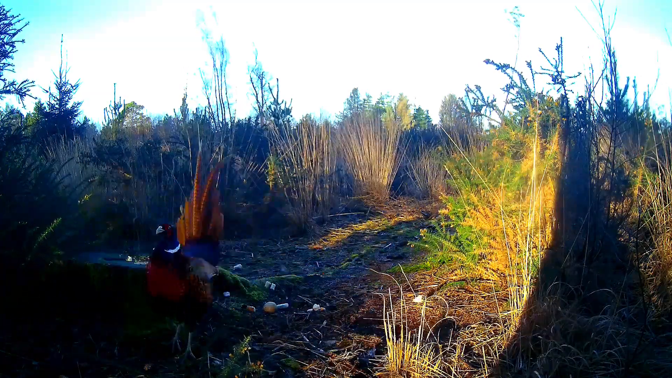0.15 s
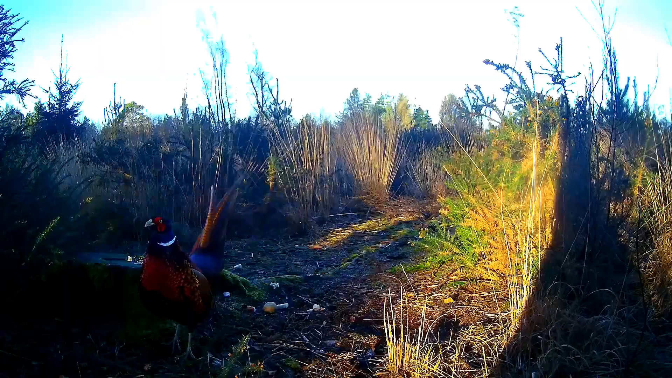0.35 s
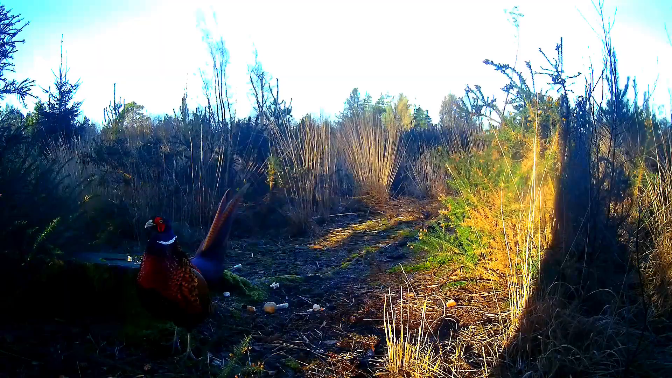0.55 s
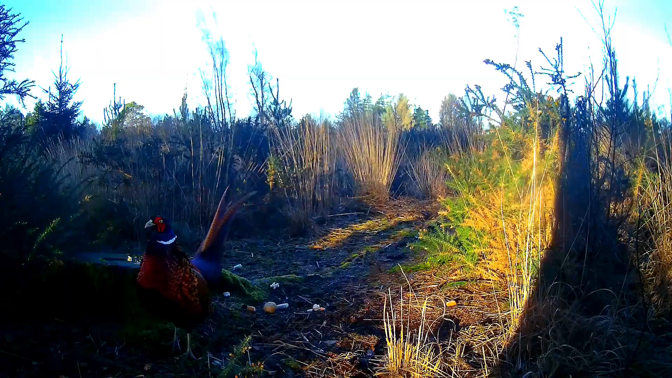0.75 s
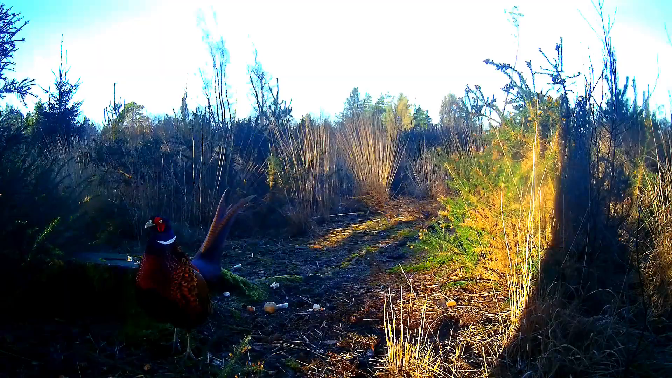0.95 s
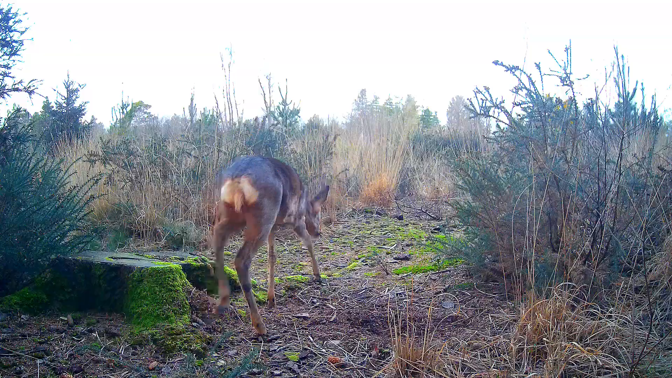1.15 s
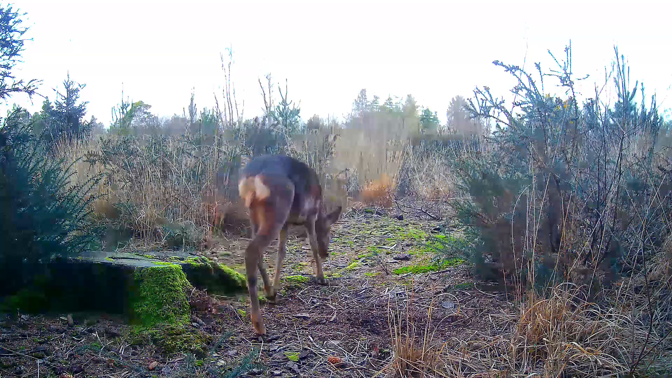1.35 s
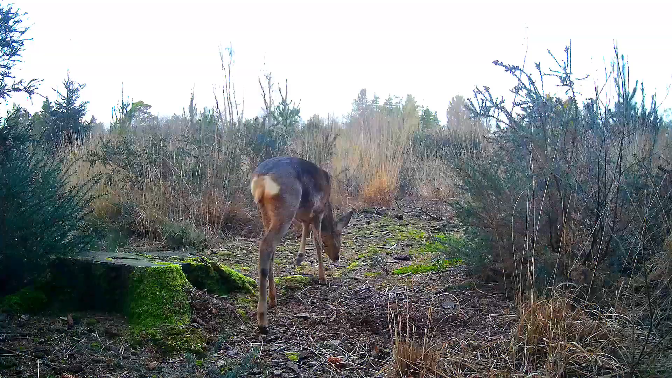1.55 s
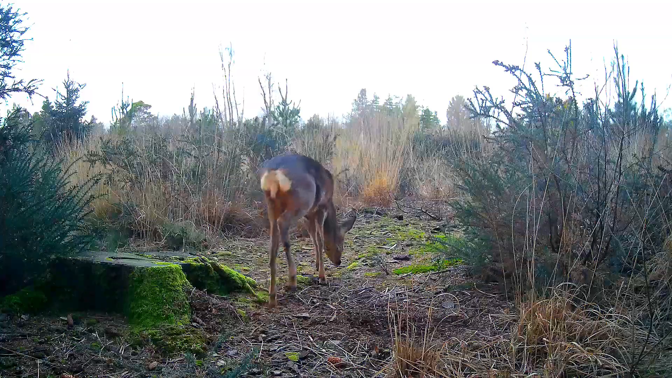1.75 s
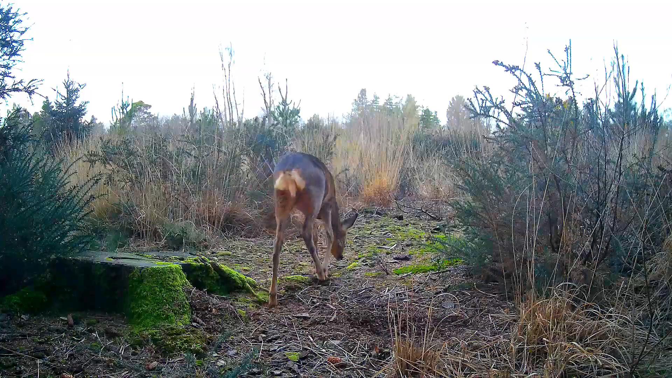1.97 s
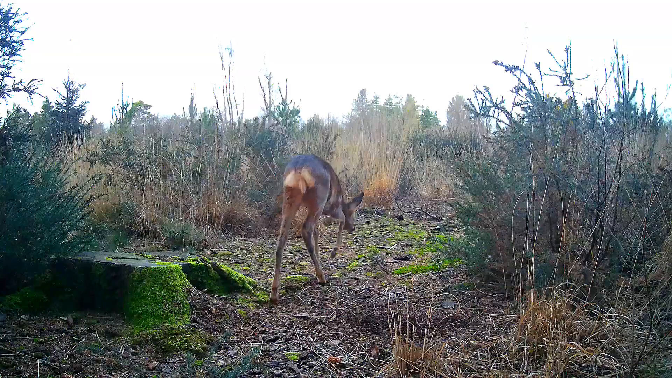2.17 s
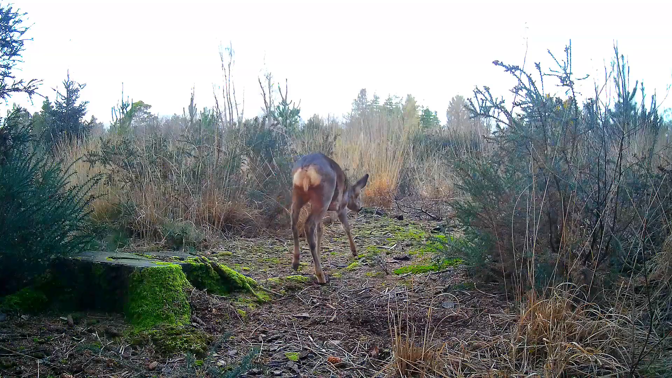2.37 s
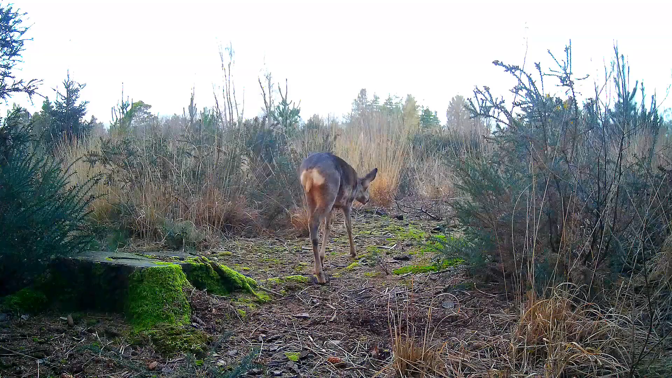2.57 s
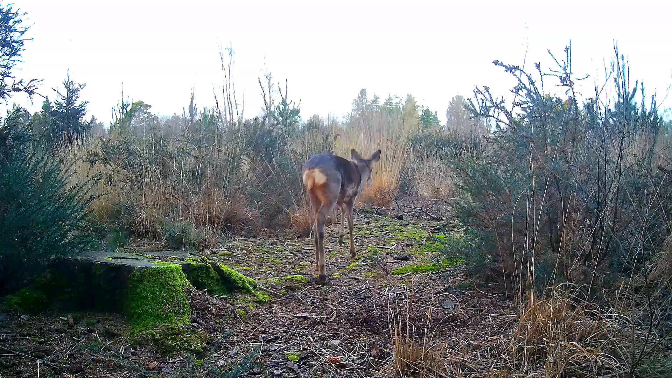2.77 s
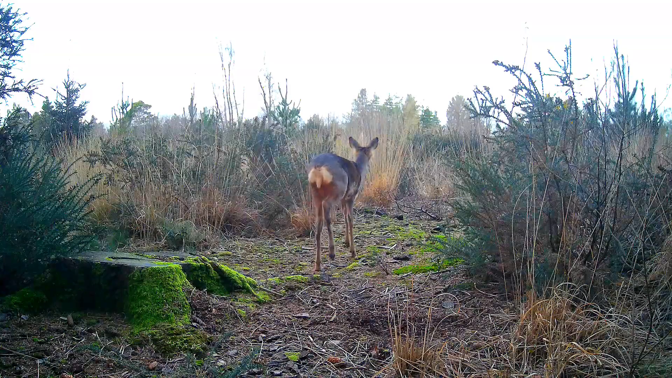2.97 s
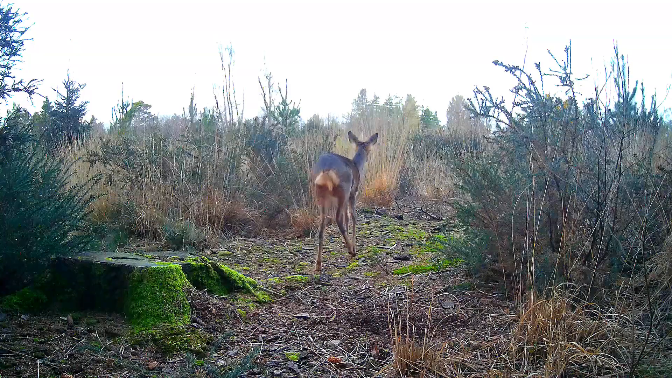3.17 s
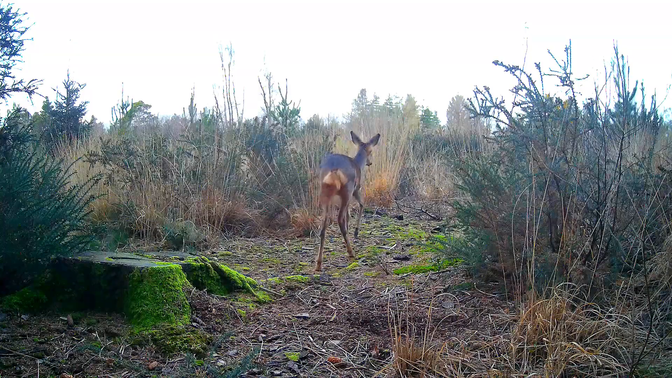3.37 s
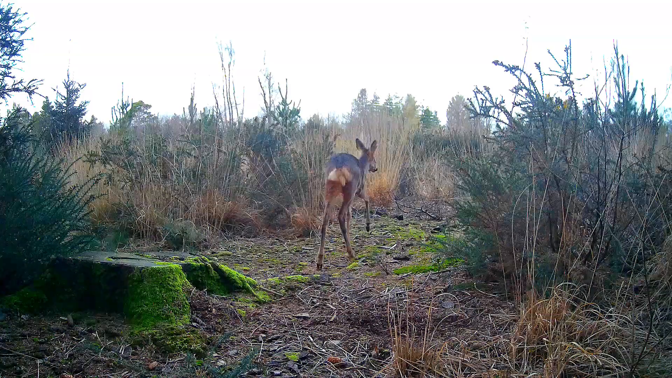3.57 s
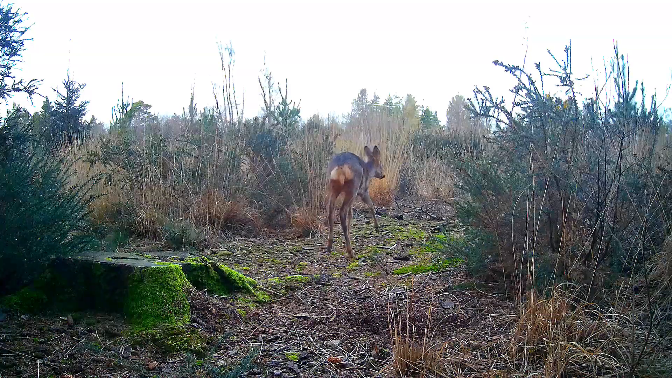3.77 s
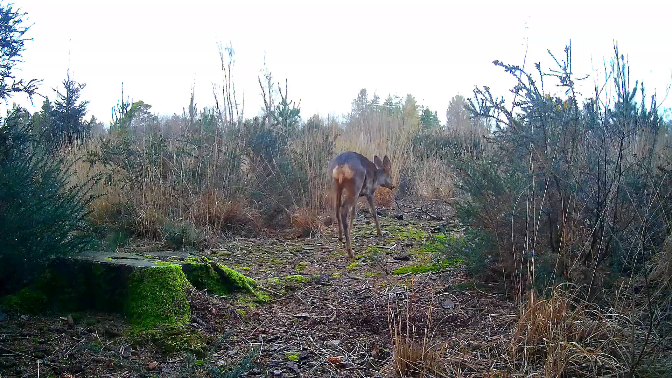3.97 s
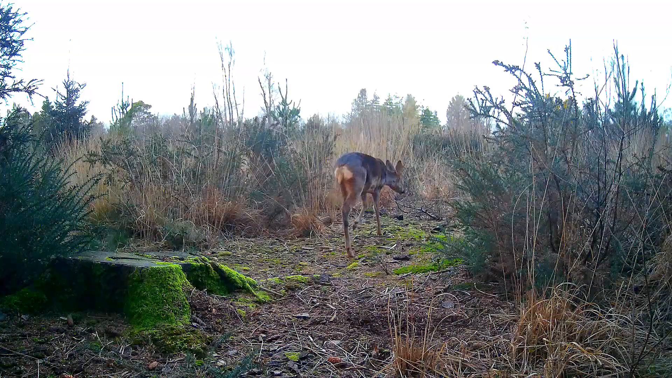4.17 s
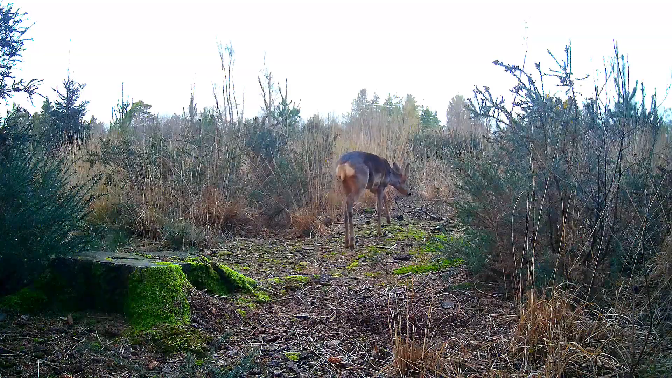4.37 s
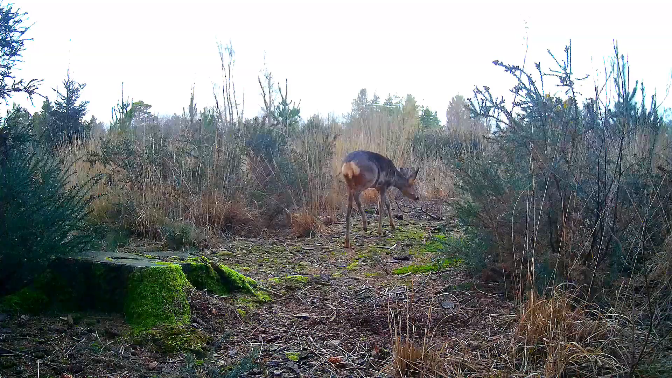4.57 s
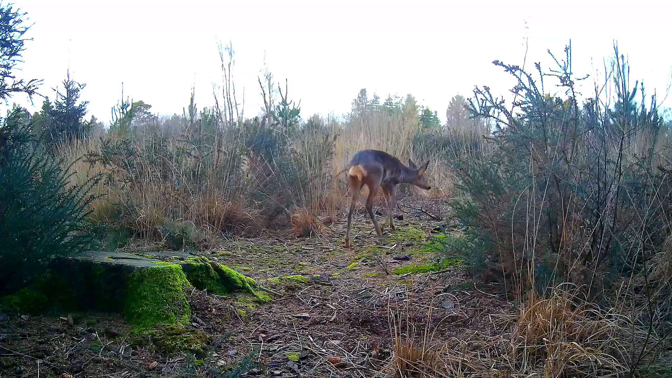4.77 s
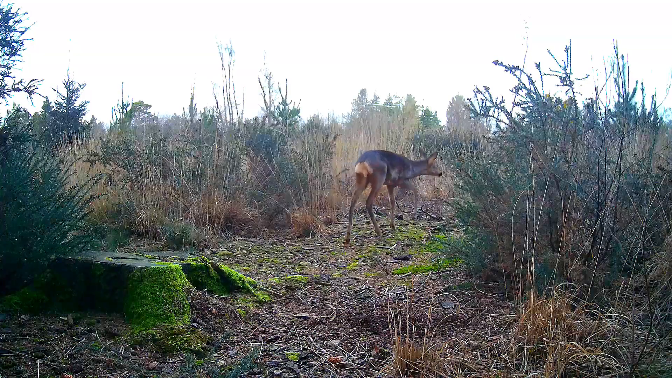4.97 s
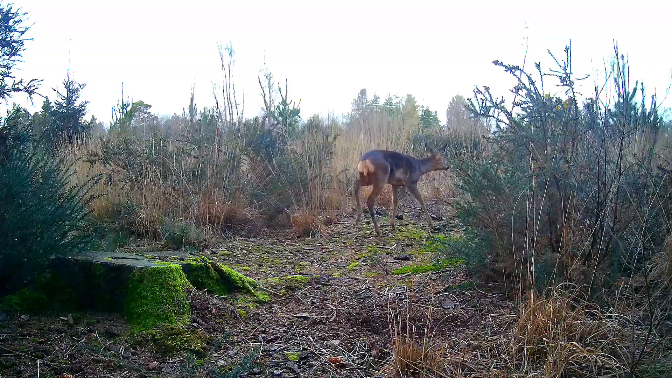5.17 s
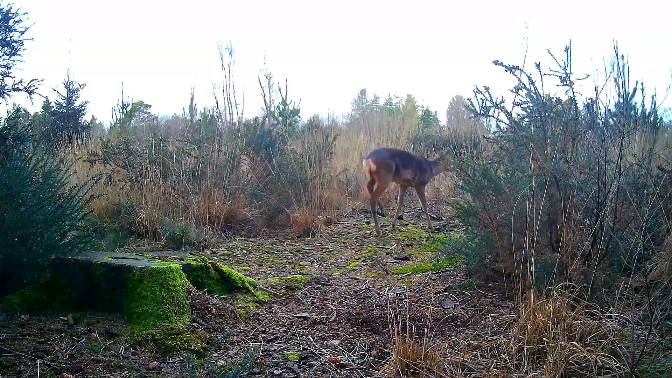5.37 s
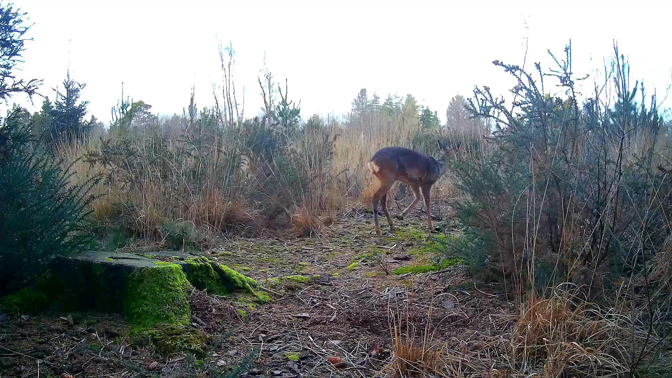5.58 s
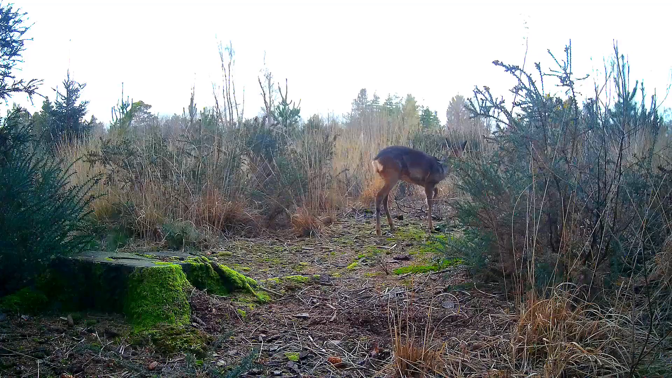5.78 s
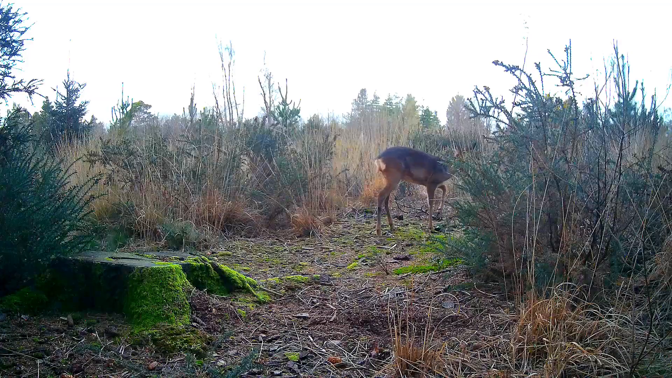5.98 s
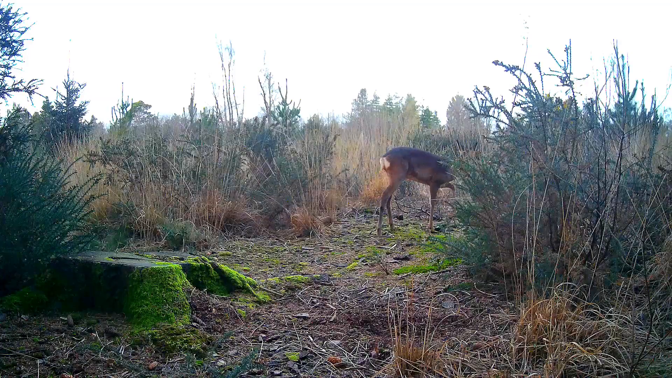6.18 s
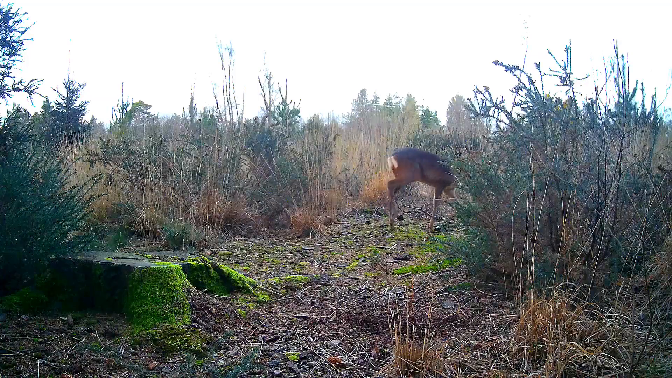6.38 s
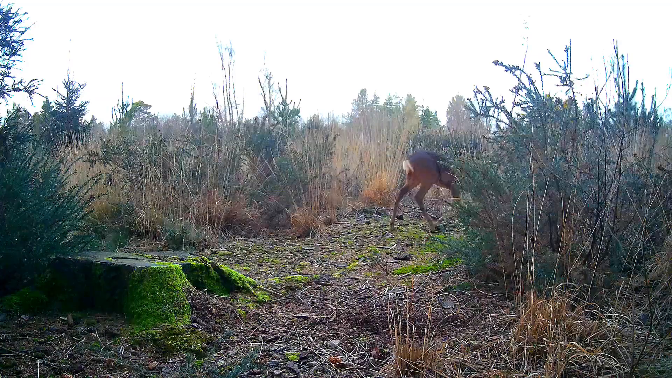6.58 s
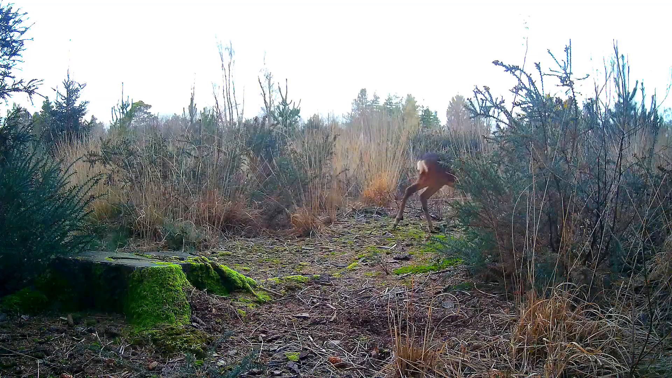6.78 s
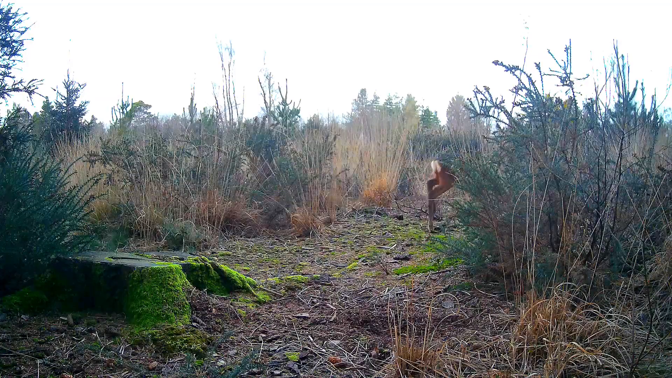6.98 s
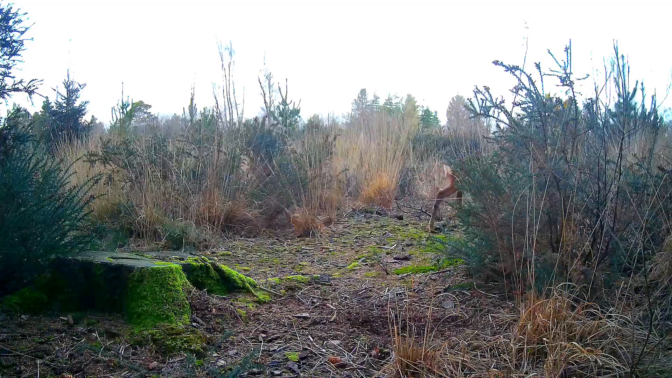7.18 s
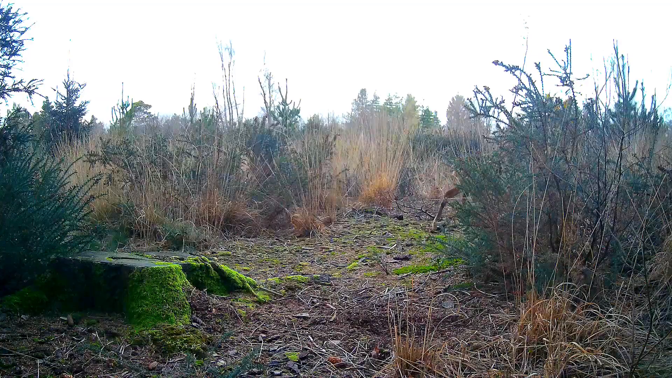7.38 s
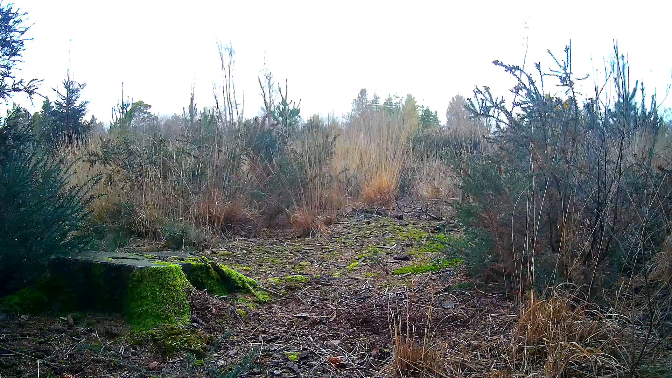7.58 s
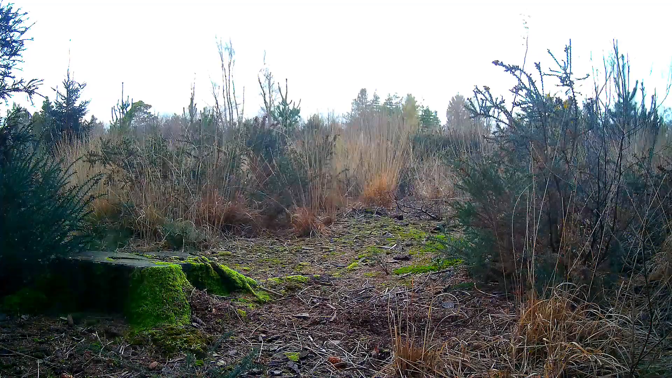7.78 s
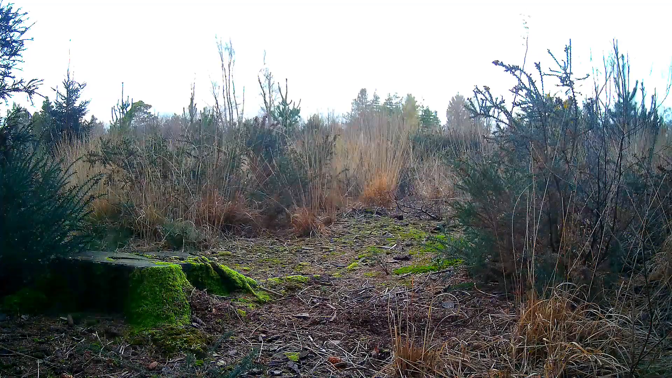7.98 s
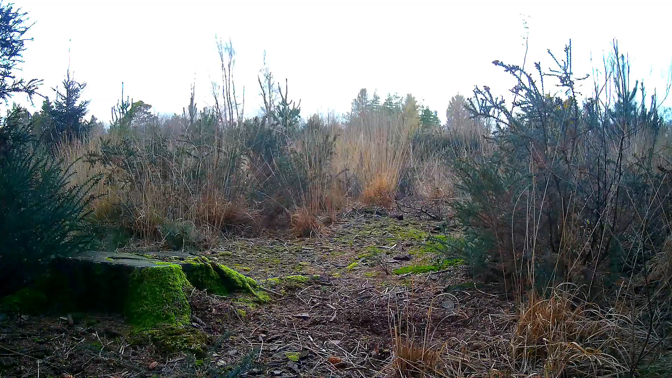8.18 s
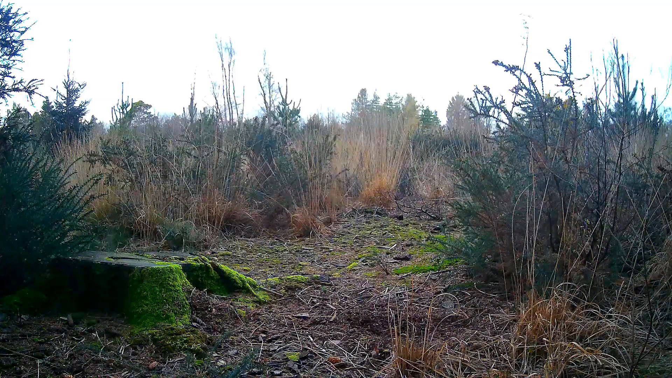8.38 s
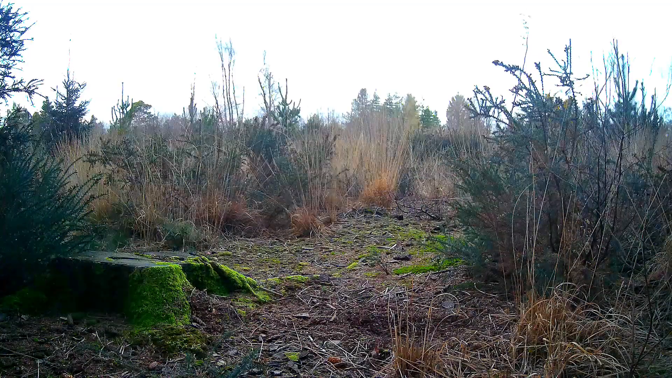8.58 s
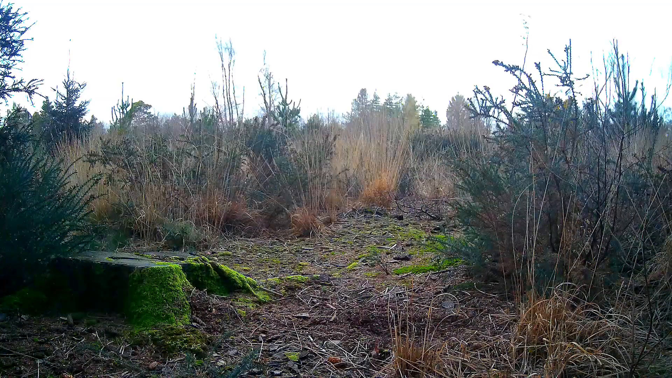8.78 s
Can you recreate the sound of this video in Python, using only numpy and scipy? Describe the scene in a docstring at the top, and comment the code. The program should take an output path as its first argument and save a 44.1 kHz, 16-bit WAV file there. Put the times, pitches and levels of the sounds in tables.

```python
"""A heath clearing among trees, over a hiss of air and of a small camera, 2 dB louder until about 1.1 s.
First a pheasant ends its display with the last fast wing beats, low pulses of air with noise rustle, while a
close warbler sings gliding sines. From 2.2 s a softer singer answers to the right; two twigs ring in short
modes under a deer's hooves; faint birds call far ahead, then far left. Late come thin high whistles, then a
quick low chatter. Trunks scatter every note and tick into a short tail, by convolution with dying noise."""
import sys
import numpy as np
from scipy import signal
from scipy.fft import rfft, irfft
from scipy.io import wavfile
from scipy.ndimage import uniform_filter1d

SR = 44100
rng = np.random.default_rng(int(sys.argv[2]) if len(sys.argv) > 2 else 0)


def invert_db(x):
    """Field ratio 10**(x/20) for x, a level in decibels (scalar or array-like)."""
    u = np.asarray(x, float) / 20
    return 10 ** u


def persist_wave(psi):
    """Save psi, clipped to +-1, as 16-bit WAV."""
    counts = np.round(np.clip(psi, -1, 1) * 32767).astype(np.int16)
    wavfile.write(sys.argv[1], SR, np.atleast_2d(counts).T)


N = 389844

# hiss spectra, shared by both sides and opposed, before scaling to rms 1: [f/Hz, relative level/dB per Hz]
HISS_SHARED = [(12, -27), (20, 2.5), (129, -3.5), (343, -8.5), (885, -6), (3190, -14.5), (15600, -18.5)]
HISS_OPPOSED = [(59, -62), (100, -24), (488, 1), (980, 1), (4780, -6.5), (15600, -10)]
# wing beats: [t/s, push level/dB, feather rustle reference level/dB]
WING_BEATS = [(0.008, -13.5, -32), (0.029, -22, -38.5), (0.058, -20, -32.5), (0.084, -14.5, -32),
              (0.0956, -33, -40.5), (0.103, -24.5, -42), (0.134, -22, -34), (0.163, -22.5, -44),
              (0.172, -26, -38)]
# thin flicks of the quills: [t/s, level/dB]
QUILL_FLICKS = [(0.026, -38), (0.101, -41.5), (0.155, -47)]

# Song levels are those at a note's crest, before the weighting by pitch.
# the close singer's left-right balance turns with pitch: [f/Hz, left over right level/dB]
NEAR_BALANCE = [(3200, -10), (4600, -11), (5200, 18), (6000, -2)]
# close singer's slurs: [start t/s, length t/s, from f/Hz, to f/Hz, level/dB]
NEAR_SLURS = [ (0, 0.013, 5300, 5080, -46.5), (.047, 0.029, 6010, 4730, -43.5),
              (.073, 0.04, 4690, 4675, -48.5), (.198, 0.027, 2704, 4320, -51),
              (.216, 0.041, 4420, 4050, -49), (.298, .042, 4310, 4740, -45.5),
              (.421, 0.012, 4980, 3030, -46), (.518, 0.0057, 4830, 6220, -45.5),
              (.527, 0.0091, 4760, 5310, -43), (.535, 0.11, 5290, 5030, -48),
              (.668, 0.024, 5110, 5060, -49), (.83, 0.0075, 4980, 4860, -41.5),
              (.838, 0.022, 4800, 6660, -45), (.937, 0.037, 3070, 3294, -61.5),
              (.975, 0.038, 3300, 4020, -54), (1.078, 0.014, 4020, 5320, -43),
              (1.09, 0.012, 5270, 5265, -41.5), (1.107, 0.005, 5300, 4430, -44),
              (1.117, .006, 5140, 4400, -50), (1.32, 0.045, 2670, 4490, -55.5),
              (1.365, 0.039, 4570, 4020, -49), (1.634, 0.033, 4860, 5920, -50.5),
              (1.661, 0.012, 5820, 5090, -44), (1.676, 0.028, 5000, 5320, -48),
              (1.77, 0.038, 3293, 5450, -45), (1.805, 0.037, 5460, 4560, -46.5)]
# its arches, up and back: [start t/s, length t/s, edge f/Hz, turn f/Hz, level/dB]
NEAR_ARCHES = [ (.245, 0.034, 4010, 5404, -47), (0.433, 0.033, 3050, 3460, -56.5),
               (0.706, 0.012, 3080, 3810, -54), (0.762, 0.02, 2970, 3536, -54),
               (0.819, 0.018, 4780, 6000, -51.5), (1.057, 0.01, 4450, 5400, -52),
               (1.171, 0.018, 4600, 4830, -46.5), (1.235, 0.016, 4550, 4676, -45),
               (1.465, .03, 2830, 3360, -60), (1.498, 0.074, 2720, 3090, -60.5),
               (1.749, 0.012, 3470, 4860, -48)]
# its one buzz: [start t/s, length t/s, centre f/Hz, swing f/Hz, level/dB]
NEAR_BUZZ = (.997, .04, 3900, 430, -52)
# softer singer to the right, slurs: [start t/s, length t/s, from f/Hz, to f/Hz, level/dB]
SECOND_SLURS = [ (2.24, 0.018, 3820, 4560, -62), (2.26, 0.1, 4560, 4640, -68),
                (2.343, 0.1, 5680, 6680, -60.5), (2.563, 0.015, 5800, 4770, -61),
                (2.582, .015, 3920, 3480, -65), (2.61, .045, 3490, 3900, -68),
                (2.757, 0.028, 7000, 5750, -58.5), (2.828, 0.027, 5560, 5300, -59),
                (2.874, 0.02, 7600, 5800, -58.5), (2.972, .02, 3630, 4667, -64),
                (2.992, 0.06, 4640, 4630, -63), (3.293, 0.014, 5590, 4700, -58.5),
                (3.318, 0.014, 3630, 5550, -63), (3.33, 0.091, 5530, 5700, -70),
                (3.42, .07, 6860, 6790, -56), (3.49, 0.071, 6750, 5550, -57.5),
                (3.578, .041, 1900, 4510, -52), (3.619, 0.033, 4540, 4250, -53),
                (8.64, 0.091, 4590, 3880, -62), (8.724, 0.011, 3950, 4380, -60),
                (8.737, 0.01, 4500, 4600, -50), (8.828, 0.01, 4900, 2870, -56)]
# its arches: [start t/s, length t/s, edge f/Hz, turn f/Hz, level/dB]
SECOND_ARCHES = [(2.718, 0.031, 5200, 5380, -63), (6.145, .047, 3270, 3850, -56),
                 (6.194, 0.093, 3334, 3830, -55)]
# twig snaps: [t/s, level/dB, left over right level/dB]
TWIG_SNAPS = [(2.5564, -47.5, 5), (3.2054, -37, 5.5)]
# modes of a twig: [f/Hz, relative level/dB, decay by 60 dB t/s]
TWIG_MODES = [(1310, -20, 0.035), (2760, -0.5, 0.0078), (4100, 3, 0.0029), (8800, -14, .005)]
# far bird ahead, a rise and a sag with a hook: [t/s after the start, f/Hz at pitch ratio 1]
RISE = [(0, 4780), (.12, 6050)]
SAG = [(0, 5100), (.07, 4450), (.13, 4100), (.2, 5150)]
# their repeats: [start t/s, pitch ratio, level/dB]
RISE_REPEATS = [(3.13, 0.9, -75.5), (6.545, 0.98, -76), (7.11, 1.01, -76), (7.71, 1, -75.5)]
SAG_REPEATS = [(2.845, 0.95, -75.5), (6.28, 0.93, -76), (6.824, 1, -74.5), (7.385, 0.99, -74)]
# far bird on the left, a long fall and a short rise: [t/s after the start, f/Hz at pitch ratio 1]
SWOOP = [(0, 5400), (.04, 4530), (.11, 3600), (.165, 5470)]
# its repeats: [start t/s, pitch ratio, level/dB]
SWOOP_REPEATS = [(4.228, 1.15, -86.5), (4.714, 1, -82.5), (5.177, 1.01, -86)]
# its single slurs: [start t/s, length t/s, from f/Hz, to f/Hz, level/dB]
LEFT_SLURS = [(4.01, .08, 4800, 5900, -83.5), (5.6, 0.11, 6190, 4500, -86.5), (5.61, .025, 3480, 3500, -80),
              (5.77, 0.048, 4050, 4120, -86), (5.82, .1, 8550, 8570, -80)]
# thin high whistles, falling: [start t/s, length t/s, from f/Hz, to f/Hz, level/dB]
HIGH_SLURS = [(6.905, 0.068, 7370, 7120, -61.5), (7.038, .067, 7340, 7160, -63),
              (7.255, 0.085, 8560, 7800, -58.5), (7.348, 0.15, 9100, 7820, -50),
              (7.468, 0.095, 8050, 7200, -58.5)]
# and one arch: [start t/s, length t/s, edge f/Hz, turn f/Hz, level/dB]
HIGH_ARCHES = [(7.345, 0.056, 7550, 7900, -59)]
# quick low chatter, slurs: [start t/s, length t/s, from f/Hz, to f/Hz, level/dB]
CHATTER_SLURS = [ (7.788, 0.0086, 3800, 4030, -52.5), (7.802, 0.014, 3420, 2600, -48.5),
                 (7.812, 0.049, 2890, 2050, -49.5), (7.941, .006, 3400, 3950, -55),
                 (7.958, 0.026, 3720, 2115, -53.5), (7.978, 0.029, 3390, 3470, -54),
                 (8.024, 0.018, 3520, 4130, -57.5), (8.052, 0.019, 2300, 2880, -56),
                 (8.078, 0.014, 3630, 4100, -53.5), (8.118, 0.02, 2270, 2400, -55),
                 (8.135, 0.0074, 3750, 3700, -54.5), (8.185, 0.0083, 3960, 3540, -50),
                 (8.199, 0.02, 2040, 2830, -59.5), (8.238, 0.019, 3250, 3550, -61),
                 (8.295, .02, 2950, 3200, -62), (8.815, .01, 3750, 3780, -60)]
# its arches: [start t/s, length t/s, edge f/Hz, turn f/Hz, level/dB]
CHATTER_ARCHES = [(8.099, 0.015, 2790, 3310, -56), (8.147, .025, 2490, 3030, -57.5)]


def rms_one(x):
    """Normalisation: division by the root mean square gives unit effective value."""
    return x / np.sqrt(np.mean(x ** 2) + 1e-20)


def band(x, low_hz, high_hz):
    """Band-pass filtering with a maximally flat (Butterworth) response."""
    return signal.sosfilt(signal.butter(2, [low_hz, high_hz], "band", fs=SR, output="sos"), x)


def steep(x, low_hz, high_hz):
    """Cascaded filters: two equal band-passes double the slopes beside the band; rms 1."""
    return rms_one(band(band(x, low_hz, high_hz), low_hz, high_hz))


def pan(x, db):
    """Intensity stereophony: two channels whose levels differ by db, left over right."""
    return x * np.array([invert_db(db / 2), invert_db(-db / 2)]).reshape(2, -1)


def coloured(spectrum):
    """Spectral shaping: white noise weighted in the frequency domain, rms 1."""
    hz, db = np.transpose(spectrum)
    log_hz = np.log(np.fft.rfftfreq(N, 1 / SR) + 1)
    shape = invert_db(np.interp(log_hz, np.log(hz + 1), db))
    return rms_one(irfft(rfft(rng.standard_normal(N)) * shape, N))


def hiss():
    """Superposed shared and opposed noise: air and camera hiss, 2 dB louder until about 1.1 s."""
    shared = invert_db(-62) * coloured(HISS_SHARED)
    opposed = invert_db(-66.5) * coloured(HISS_OPPOSED)
    extra_db = np.interp(np.arange(N) / SR, [1.06, 1.12], [2.0, 0])
    return np.array([shared + opposed, shared - opposed]) * invert_db(extra_db)


def wings():
    """Pulsed air displacement: each stroke sucks a low pulse and leaves eddies and rustle; quills flick."""
    vane_hz = 1180  # buzz of a loaded feather
    length = SR // 2
    t, out = np.arange(length) / SR, np.zeros(N)
    noise = rng.standard_normal((4, length))
    eddies = steep(noise[0], 94, 344)
    swish = rms_one(band(noise[1], 930, 2570)) + 0.5 * noise[1]
    rustle = steep(noise[2], 832, 1490)
    thin = rms_one(band(noise[3], 4400, 5430))
    rattle = invert_db(2.2 * rms_one(band(noise[3], 44, 200)))  # feathers clatter in uneven lumps
    for s, push_db, rustle_db in WING_BEATS:
        width_s = 0.0024 * invert_db(0.35 * (push_db + 18.0))  # stronger pulses are wider
        u = (t - s - 0.001) / width_s
        push = -invert_db(push_db) * (1 - 0.54 * u ** 2) * np.exp(-0.4 * u ** 2)
        slow = np.exp(-((t - s) / 0.012) ** 2)
        quick = np.exp(-((t - s) / 0.0036) ** 2)
        feathers = invert_db(rustle_db - 14.0) * rustle + invert_db(rustle_db - 18.5) * swish
        lasting = invert_db(push_db - 18.5) * eddies + rattle * feathers
        vane = np.sin(2 * np.pi * vane_hz * (t - s))
        brief = invert_db(rustle_db - 7.0) * (0.5 * rustle + vane)
        out[:length] += push + slow * lasting + quick * brief
    for s, db in QUILL_FLICKS:
        envelope = invert_db(db) * np.exp(-((t - s) / 0.0026) ** 2)
        out[:length] += envelope * (thin + 0.8 * rustle + 0.2 * swish)
    return out


def whistle(note, tremble, overtone_db, tilt_db, count):
    """Harmonic synthesis: a gliding sine and overtones, tilt_db weaker per octave from the beak's pitch."""
    beak_hz, fade_s = 4600, 0.0015
    s, hz, db = np.transpose(note)
    t = np.arange(round(s[0] * SR), min(round(s[-1] * SR), N))
    pitch = uniform_filter1d(np.interp(t / SR, s, hz), size=67, mode="nearest")
    level_db = uniform_filter1d(np.interp(t / SR, s, db), size=67, mode="nearest")
    phase = 2 * np.pi * np.cumsum(pitch * tremble[t]) / SR
    fade = np.clip(np.minimum(t - t[0], t[-1] - t) / (fade_s * SR), 0, 1)
    tone = 0
    for k in range(1, count + 1):
        partial_db = overtone_db * (k > 1) - tilt_db * abs(np.log2(k * pitch / beak_hz))
        tone = tone + invert_db(partial_db) * np.sin(k * phase)
    return t, pitch, np.sqrt(2) * invert_db(level_db) * fade * tone


def song(notes, balance, waver=0.14, overtone_db=-46.0, tilt_db=0, count=3):
    """Random frequency and amplitude modulation: the pitch trembles and the level wavers."""
    out = np.zeros((2, N))
    tremble = 1 + 0.0066 * rms_one(band(rng.standard_normal(N), 25.4, 123))
    for note in notes:
        t, pitch, tone = whistle(note, tremble, overtone_db, tilt_db, count)
        out[:, t] += pan(tone, np.interp(pitch, *np.transpose(balance)))
    return out * (1 + waver * rms_one(band(rng.standard_normal(N), 4.9, 120)))


def voiced(row, u, hz, lean_db=0, onset_db=0, fade_db=0, crest=0.28):
    """Vocal effort: a note swells to its crest, fades, and is lean_db softer per octave below its top."""
    swell = np.interp(u, [0, crest, 1], [-onset_db, 0, -fade_db])
    level_db = row[4] + swell - lean_db * np.log2(hz.max() / hz)
    return np.transpose([row[0] + row[1] * u, hz, level_db])


def phrase(slurs, arches, bend, turn=0.319, **effort):
    """Pitch glides: slurs relax exponentially, arches turn back; notes that touch share one breath."""
    legato_s = 0.003
    u = np.linspace(0, 1, 25)
    settle = (1 - np.exp(-bend * u)) / (1 - np.exp(-bend))
    bow = np.sin(np.pi * u ** (np.log(0.5) / np.log(turn)))  # turn: share of the arch before it turns
    notes = []
    for rows, shape in ((slurs, settle), (arches, bow)):
        for row in rows:
            hz = row[2] + (row[3] - row[2]) * shape
            notes.append(voiced(row, u, hz, **effort))
    joined = []
    for note in sorted(notes, key=lambda note: note[0, 0]):
        if joined and abs(note[0, 0] - joined[-1][-1, 0]) < legato_s:
            note = np.vstack([joined.pop()[:-1], note[1:]])
            note[:, 0] = np.maximum.accumulate(note[:, 0])
        joined.append(note)
    return joined


def buzz():
    """Sinusoidal frequency modulation: the pitch swings fast about its centre."""
    swings_per_s = 130
    start, length, hz, swing_hz, db = NEAR_BUZZ
    t = np.linspace(0, length, 100)
    pitch = hz + swing_hz * np.sin(2 * np.pi * swings_per_s * t)
    return np.transpose([start + t, pitch, db + 0 * t])


def near_singer():
    """Frequency-dependent level difference: the close warbler's notes shift sideways with pitch."""
    notes = phrase(NEAR_SLURS, NEAR_ARCHES, bend=2.6, lean_db=18.5)
    return song(notes + [buzz()], NEAR_BALANCE, overtone_db=-29.0)


def wood(x):
    """Multiple scattering: dense echoes from trunks; near ones die fast, the far edge lingers."""
    near_t60_s, far_t60_s = 0.48, 2.6
    t = np.arange(SR) / SR  # the response is cut at 1 s
    decay = invert_db(-60 * t / near_t60_s) + invert_db(-17.0 - 60 * t / far_t60_s)
    shared, opposed = rng.standard_normal((2, SR)) * decay * np.minimum(t / 0.0019, 1)
    echoes = rms_one(shared + 0.71 * opposed * [[1], [-1]]) / np.sqrt(SR)  # partly alike on both sides
    return signal.fftconvolve(x.mean(axis=0)[None], echoes, axes=1)[:, :N]


def second_singer():
    """Spectral tilt: a softer voice weakens away from the beak's pitch; its arches turn late."""
    notes = phrase(SECOND_SLURS, SECOND_ARCHES, bend=0.635, turn=0.56, fade_db=4.0)
    return song(notes, [(0, -8.0)], overtone_db=-13.0, tilt_db=14.0)


def twigs():
    """Modal vibration: a snap sets the few short modes of dry wood ringing."""
    out, t = np.zeros((2, N)), np.arange(SR // 20) / SR
    snap = sum(invert_db(db - 60 * t / t60) * np.sin(2 * np.pi * hz * t) for hz, db, t60 in TWIG_MODES)
    for s, db, pan_db in TWIG_SNAPS:
        start = round(s * SR)
        out[:, start:start + len(t)] -= pan(invert_db(db) * snap, pan_db)
    return out


def repeats(figure, rows):
    """Transposition: one figure sung again at each time, pitch ratio and level."""
    return [[(start + s, ratio * hz, db) for s, hz in figure] for start, ratio, db in rows]


def ahead_bird():
    """Transposed contours: a faint far bird ahead repeats a rise and a hooked sag."""
    notes = repeats(RISE, RISE_REPEATS) + repeats(SAG, SAG_REPEATS)
    return song(notes, [(0, 1.5)], waver=0.19, tilt_db=3.0)


def left_bird():
    """Strong amplitude modulation: a faint bird far left wavers in level through swoops and slurs."""
    notes = repeats(SWOOP, SWOOP_REPEATS) + phrase(LEFT_SLURS, [], bend=0.39)
    return song(notes, [(0, 37.0)], waver=0.54, tilt_db=12.0)


def high_whistles():
    """Near-pure tones: thin high whistles swell softly and lean right as pitch climbs."""
    notes = phrase(HIGH_SLURS, HIGH_ARCHES, bend=2.2, onset_db=13.0, fade_db=6.0, crest=0.47)
    return song(notes, [(7200, 1.0), (8000, -7.5)])


def chatter():
    """Rapid glides with one overtone: short low notes in quick succession."""
    notes = phrase(CHATTER_SLURS, CHATTER_ARCHES, bend=2.2)
    return song(notes, [(0, -7.5)], overtone_db=-17, tilt_db=8.5, count=2)


def scene():
    """Direct-to-reverberant ratio: each bird and twig has its own share of echo beside its direct sound."""
    floor, beats = hiss(), wings()
    near, second, snaps = near_singer(), second_singer(), twigs()
    ahead, left, high, low = ahead_bird(), left_bird(), high_whistles(), chatter()
    send = near + invert_db(2.0) * second + invert_db(-8.0) * snaps + invert_db(8.0) * ahead
    send = send + invert_db(-8.0) * left + invert_db(-9.0) * high + invert_db(-4.5) * low
    direct = near + second + snaps + ahead + left + high + low
    return direct + pan(wood(send), -1.5) + beats + floor


def top_cut(x):
    """Nothing passes above the cut-off."""
    return signal.sosfilt(signal.butter(12, 15990, fs=SR, output="sos"), x)


def record(dry):
    """Saturation: the small microphone rounds the strongest pushes of air."""
    overload = 0.21  # limiting amplitude, full scale 1
    mix = overload * np.tanh(dry / overload)
    return top_cut(mix)


dry = scene()
out = record(dry)
persist_wave(out)
```